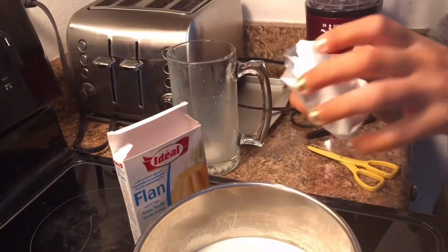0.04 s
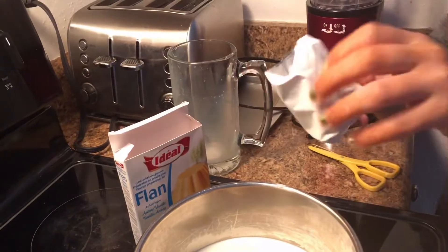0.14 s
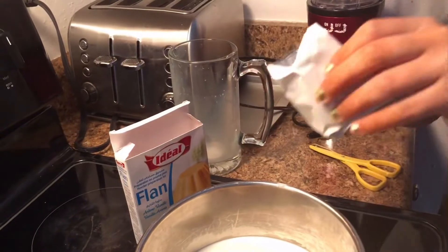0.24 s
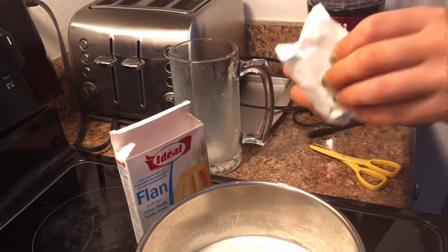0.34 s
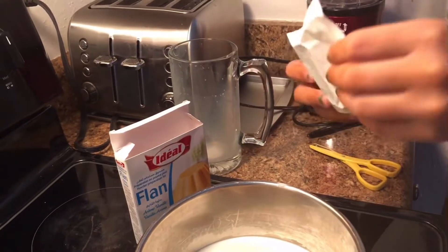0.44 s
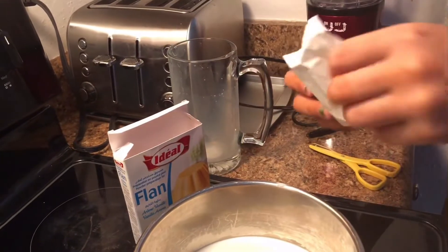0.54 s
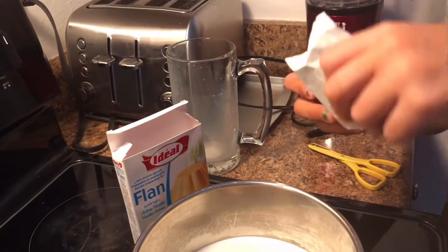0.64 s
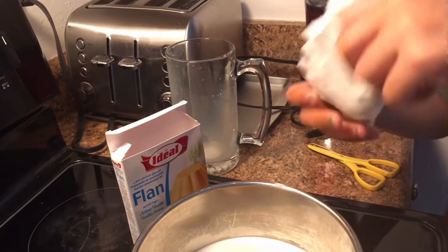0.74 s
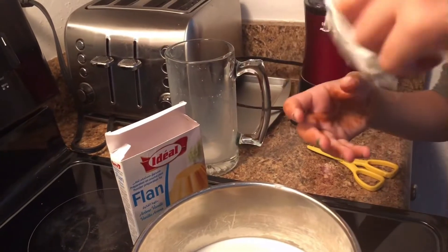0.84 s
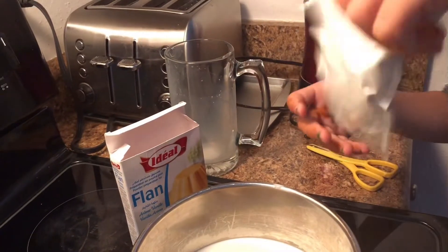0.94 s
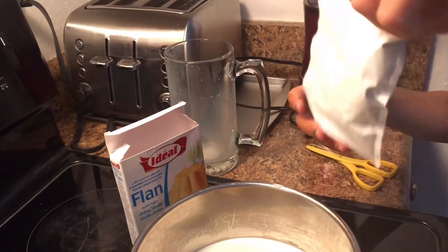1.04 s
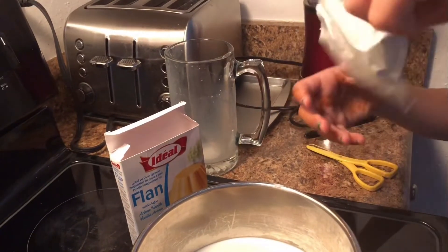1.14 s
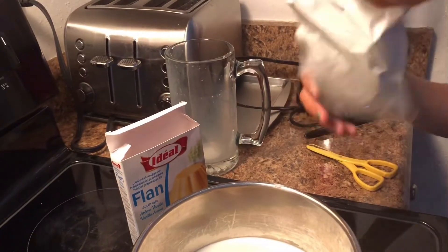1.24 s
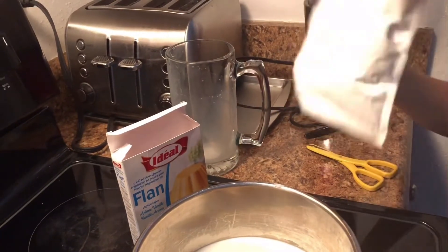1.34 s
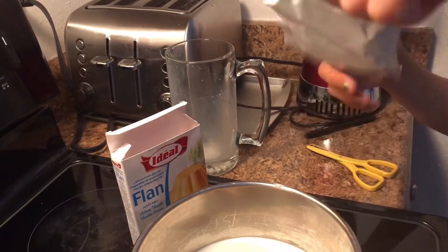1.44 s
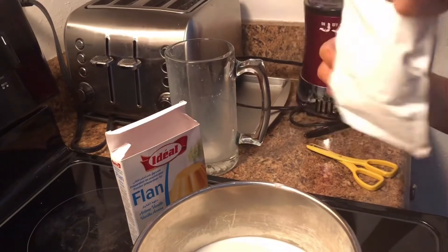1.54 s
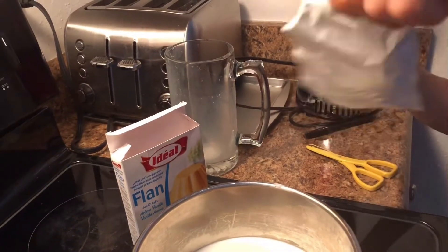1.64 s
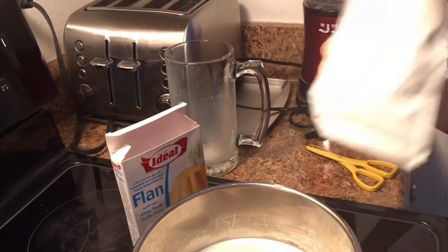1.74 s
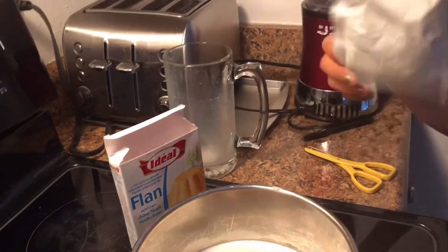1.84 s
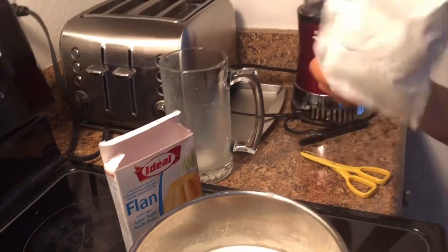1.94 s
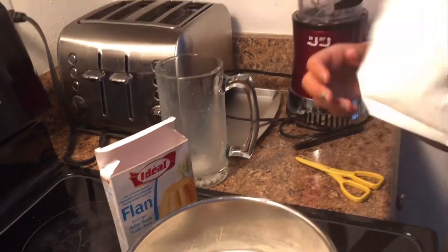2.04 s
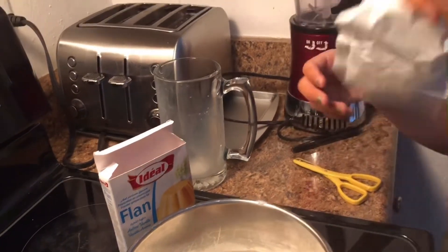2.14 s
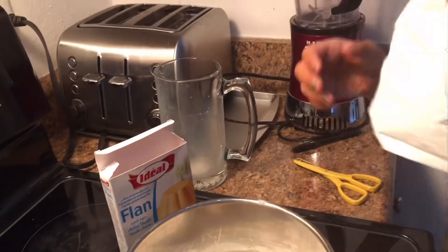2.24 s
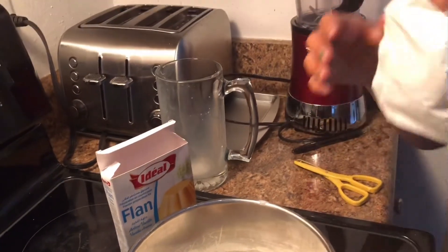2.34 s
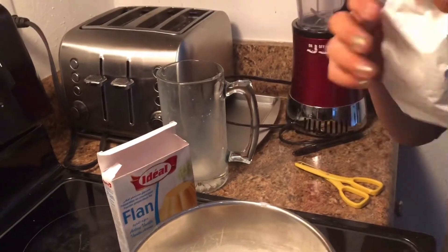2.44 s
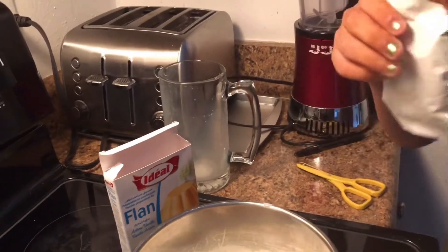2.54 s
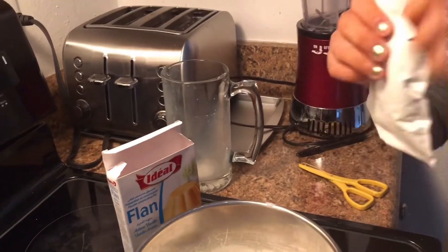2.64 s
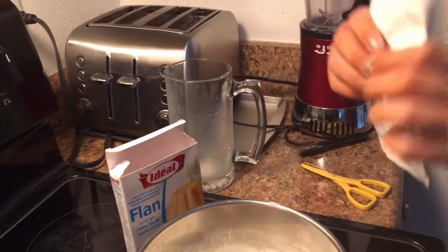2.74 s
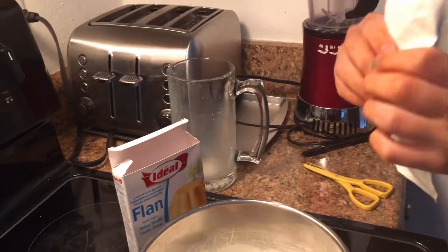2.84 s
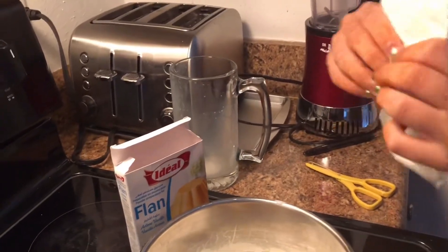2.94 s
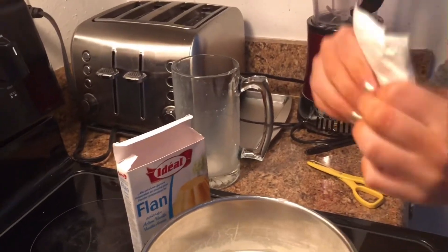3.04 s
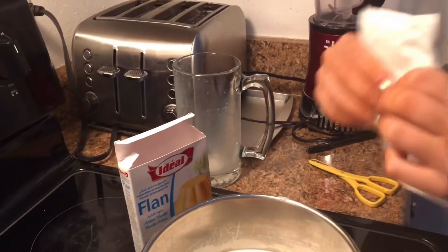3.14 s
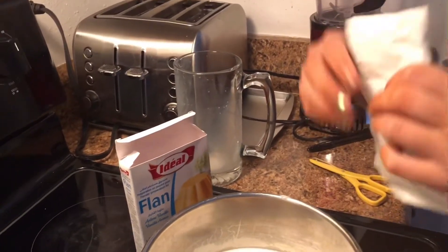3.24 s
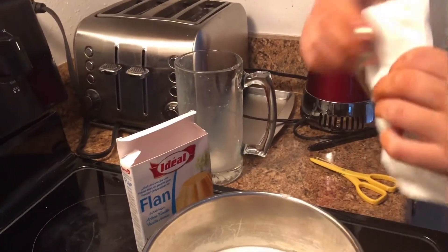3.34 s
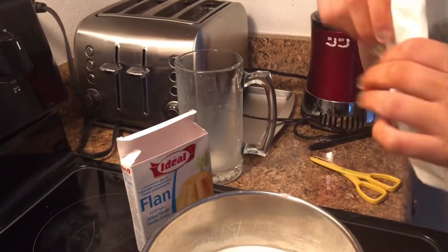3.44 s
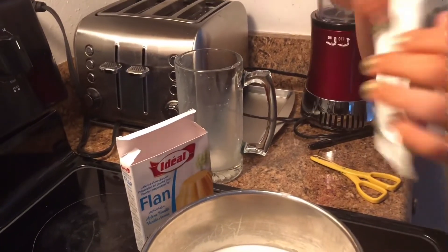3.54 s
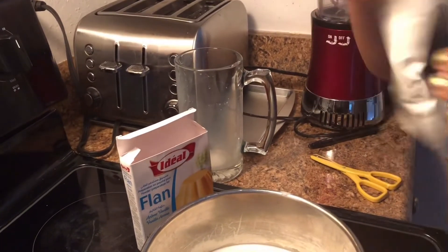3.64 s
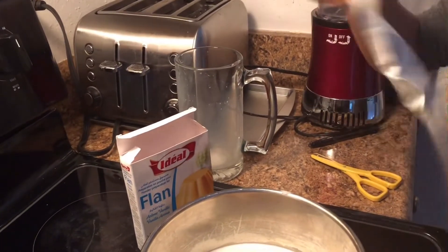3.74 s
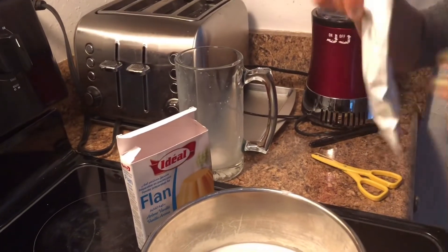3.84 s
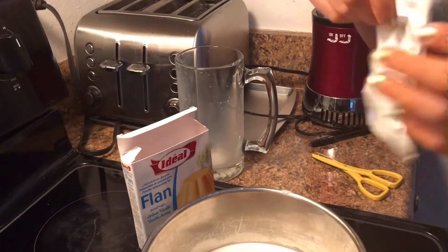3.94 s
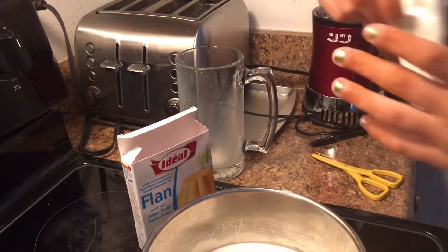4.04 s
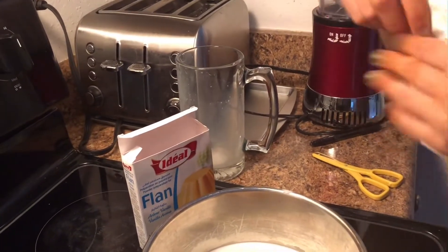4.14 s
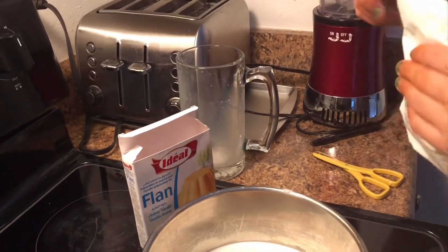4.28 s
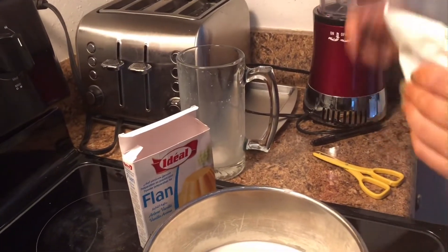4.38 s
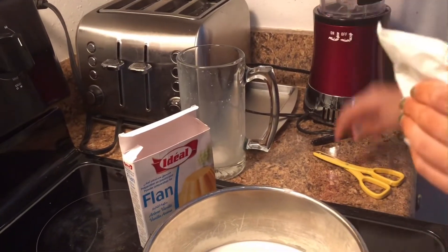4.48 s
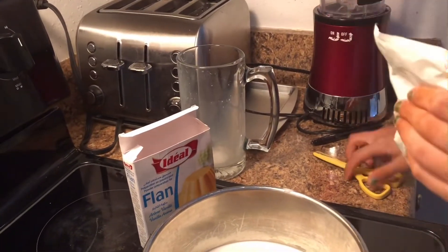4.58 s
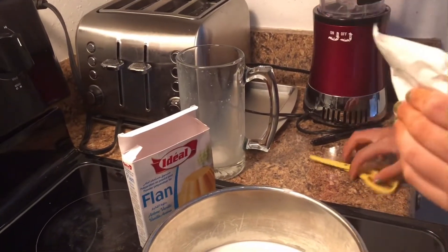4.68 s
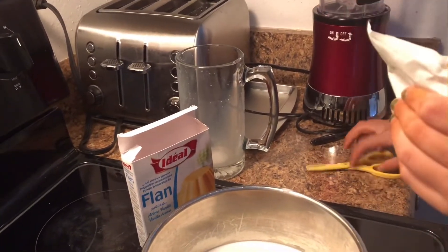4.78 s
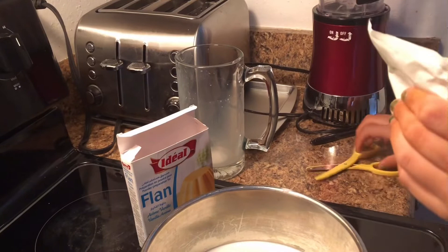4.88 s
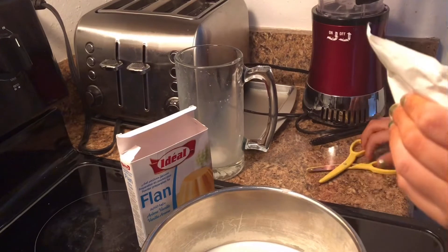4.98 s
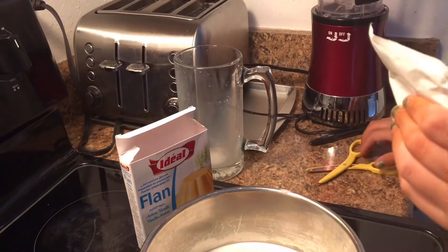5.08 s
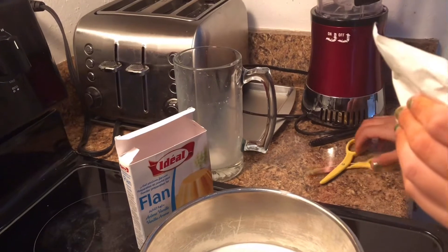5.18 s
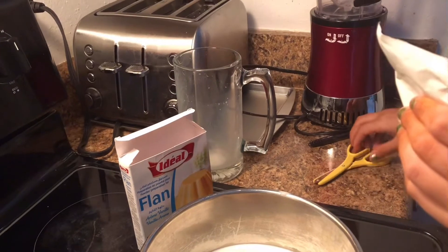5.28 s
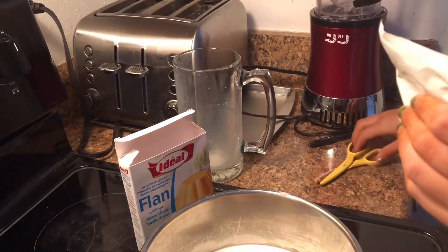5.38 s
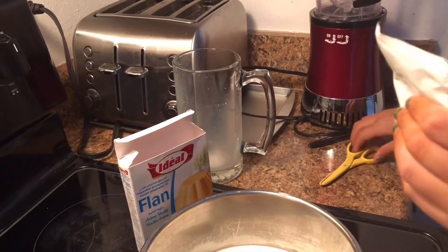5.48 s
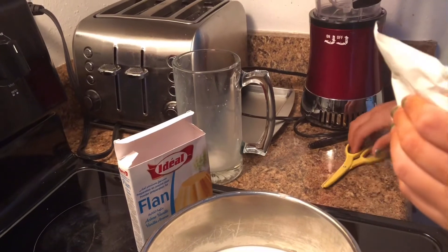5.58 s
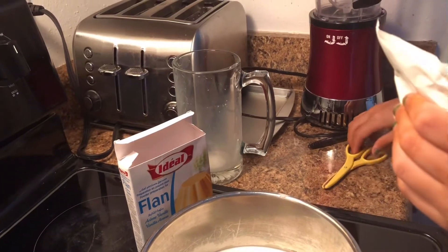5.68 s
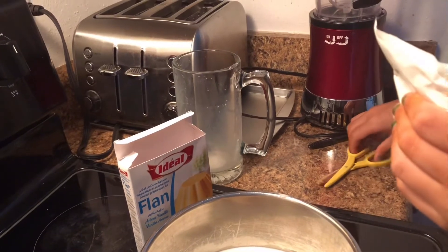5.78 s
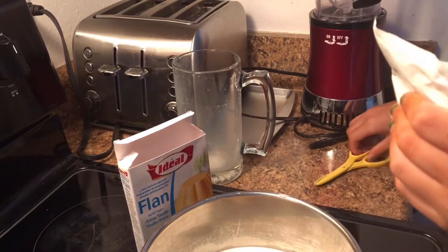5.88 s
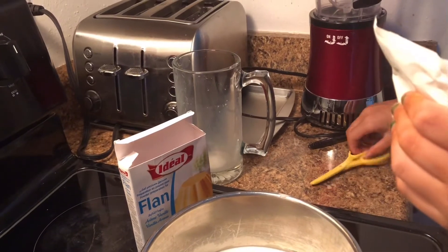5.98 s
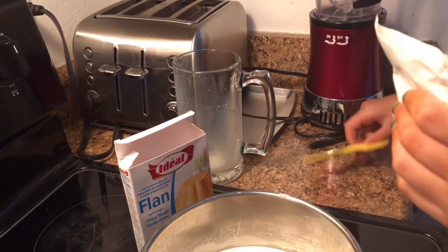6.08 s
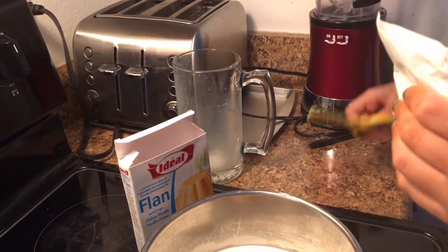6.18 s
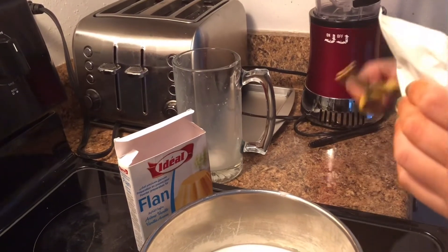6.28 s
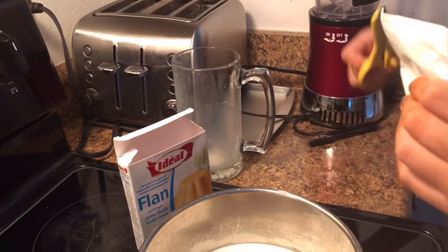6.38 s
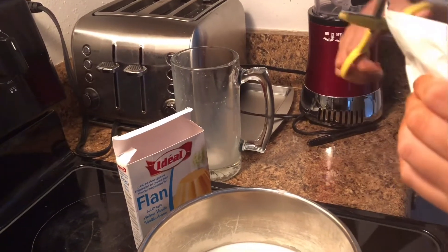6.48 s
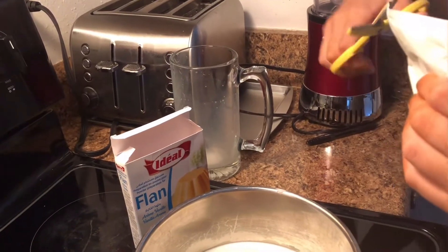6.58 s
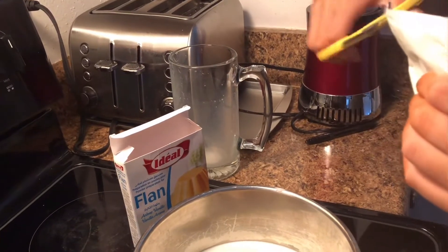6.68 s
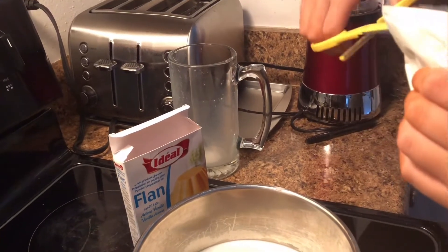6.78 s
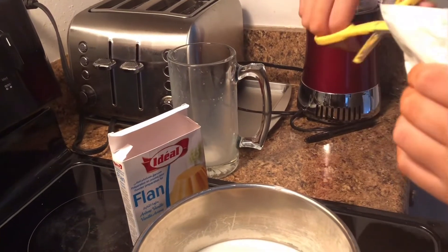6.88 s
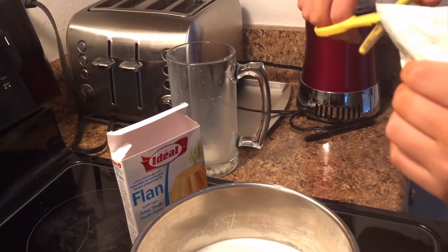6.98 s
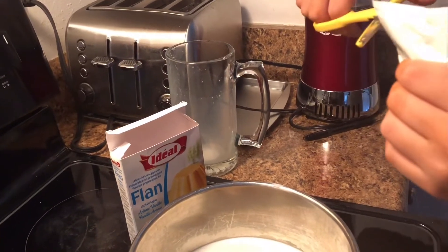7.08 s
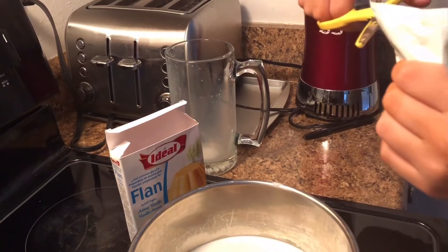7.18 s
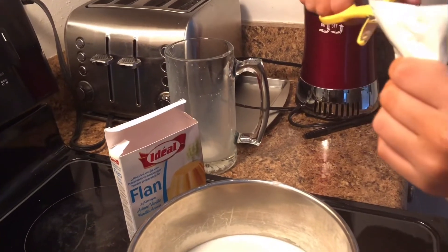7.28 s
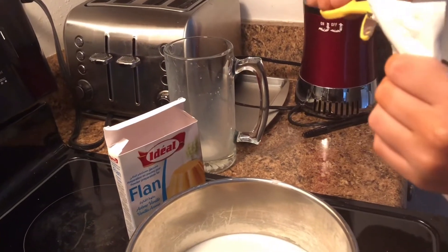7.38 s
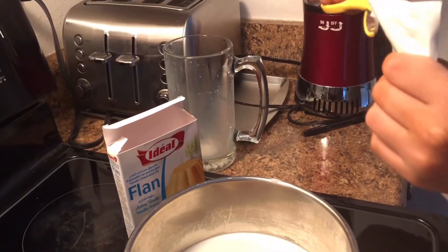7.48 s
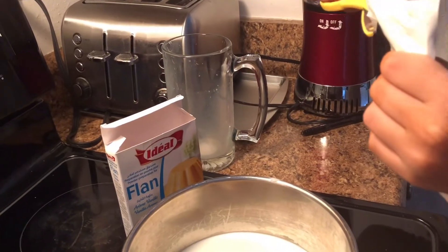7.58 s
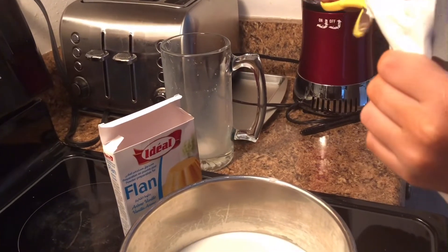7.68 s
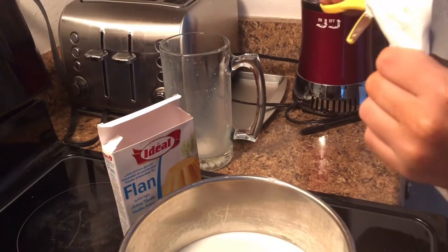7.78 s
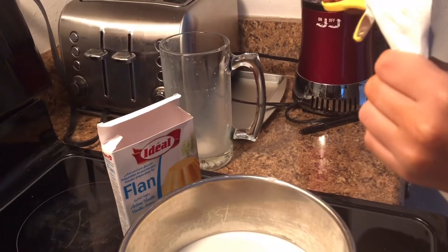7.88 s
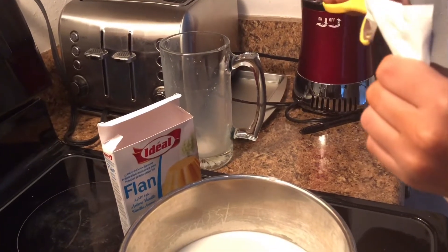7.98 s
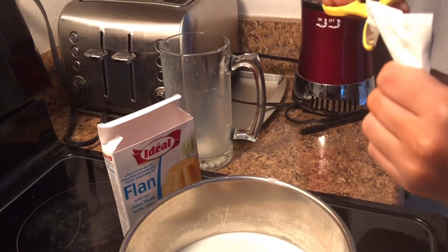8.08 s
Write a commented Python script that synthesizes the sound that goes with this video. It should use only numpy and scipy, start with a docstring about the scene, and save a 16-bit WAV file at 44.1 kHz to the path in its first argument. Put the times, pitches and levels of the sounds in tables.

```python
"""In a small kitchen with a humming appliance, a paper sachet of powder is shaken down and handled.
Its creases snap as ringing panels, its filled belly pops, and its sides rub as sprays of fine grains and folds.
Then scissors clink on the stone counter as bursts of noise with ringing steel modes, and drag over it.
They are picked up, click open and slowly close on the paper, blade sliding along blade."""
import sys
import numpy as np
from scipy import signal
from scipy.fft import rfft, irfft
from scipy.io import wavfile
from scipy.ndimage import map_coordinates

SR = 44100
rng = np.random.default_rng(int(sys.argv[2]) if len(sys.argv) > 2 else 0)


def unload_wav(signal):
    """Save mono or channel-first audio to the path in sys.argv[1] as 16-bit WAV at rate SR, clipped to [-1, 1]."""
    wavfile.write(
        sys.argv[1],
        SR,
        np.round(np.clip(np.atleast_2d(signal).T, -1, 1) * 32767).astype(np.int16),
    )


N = 358091

# Loud creases snapping through. Each row: start in seconds, panel level in dB over the first 8 ms,
# pitch of the paper panel in Hz, level of the sharp crack in dB relative to the panel.
SNAPS = [(0.278, -38.5, 1850, -17), (0.2858, -30.5, 4300, -10), (0.3316, -27.5, 1700, -13),
         (0.334, -32, 2260, -2.5), (0.394, -36, 1380, -28), (0.4448, -35.5, 1590, -11),
         (0.4495, -30.5, 5260, -20), (0.4685, -33, 1040, -17), (0.6927, -43.5, 2170, -17),
         (0.7079, -34, 2660, -5), (0.7192, -37.5, 2700, -5), (0.806, -33, 1260, -11),
         (0.917, -32.5, 1960, -20), (0.9236, -36.5, 2550, 1), (0.933, -28.5, 2200, -14),
         (0.9785, -37, 1470, -0.5), (1.026, -33, 2580, -5), (1.2172, -32.5, 2180, -5.5),
         (1.2428, -36.5, 1430, -6), (1.2543, -34, 2800, -4), (1.309, -31, 3220, -36),
         (1.3281, -22.5, 2580, -5), (1.4973, -32.5, 1920, -4), (1.5597, -22.5, 6400, -22),
         (1.5908, -31.5, 5650, -4), (1.6886, -37, 2720, -0.5), (1.7143, -39.5, 5340, -14),
         (1.797, -29.5, 3960, -28), (1.911, -42, 2480, -17), (1.935, -34.5, 1860, -8),
         (2.0551, -33, 1020, -28), (2.2376, -40, 3790, 1), (2.5454, -43.5, 1770, -8),
         (2.6592, -36, 2270, -17), (2.982, -46, 2100, -3), (3.0332, -42.5, 1750, -26),
         (3.1246, -43.5, 1950, 2.5), (3.149, -34, 1530, -19), (3.156, -35, 2780, 0),
         (3.236, -37.5, 1290, -12), (3.246, -44.5, 1390, 0.5), (3.2578, -39, 2570, -17),
         (3.557, -44.5, 2130, -4.5), (3.5941, -39.5, 2120, -13), (3.604, -35, 5200, -25),
         (3.6336, -35, 4430, -22), (3.643, -34, 3740, -18), (3.6705, -39.5, 1870, -28),
         (3.7363, -38.5, 2820, -2), (3.7546, -33.5, 2000, -8), (3.973, -40.5, 1560, -32),
         (4.0667, -51.5, 1260, -15), (4.204, -35.5, 1360, -7), (4.25, -41, 2090, -1.5),
         (4.2872, -34.5, 4460, -10), (4.4369, -50.5, 960, -26), (4.474, -49, 1700, -30),
         (7.056, -44.5, 920, -20), (7.4864, -41.5, 3620, -16), (7.5418, -40.5, 6520, -20),
         (7.5523, -33.5, 2840, 1)]
# How hard the fingers work the sachet. Each row: time in seconds, level of steady crumpling in dB before trim.
GRIP = [(0, -63), (0.2, -61.5), (0.38, -50.5), (0.62, -59), (0.78, -60), (1.19, -71), (1.3, -57),
        (2.0, -64), (2.45, -64), (2.75, -60.5), (2.9, -54), (3.24, -54.5), (3.37, -59.5), (3.68, -59),
        (4.07, -72), (4.55, -70.5), (4.66, -79.5), (7.05, -78), (7.5, -62.5), (8.12, -73)]
# Modes of the scissors. Each row: pitch in Hz, relative level in dB, free ring time (t60) in seconds.
BLADES = [(824, -11, 0.14), (1133, -6, 0.24), (1600, -3.5, 0.11), (1970, -4, 0.14), (2400, -7, 0.13),
          (2640, -7, .09), (3000, -9, .16), (3300, 2.5, 0.042), (3600, -5.5, 0.073), (3980, -3, 0.096),
          (4400, -14, 0.12), (4950, -7.5, 0.096), (6020, -0.5, 0.098), (6700, -7.5, 0.205),
          (6970, -1.5, 0.11), (7535, 5.5, 0.13), (7470, 2.5, 0.064), (7560, -5.5, .1), (8510, -2, 0.15),
          (9000, -2, .06), (10150, -18.5, 0.0786), (10270, -5.5, 0.16), (11100, -8, 0.056),
          (11700, 1, 0.18), (11700, -6.5, 0.15), (12900, -4.5, 0.075), (13800, -7.5, .1), (13710, -4, .09),
          (14600, -12, 0.069), (15400, -1, 0.06)]
LIFT_S = 6.2  # the scissors leave the counter


def from_db(db):
    """Decibels to gain."""
    return 10 ** (np.asarray(db) / 20)


def rms_one(x):
    """Scale to unit rms."""
    return x / np.sqrt(np.mean(x ** 2) + 1e-20)


def add(out, s, sound):
    """Mix a sound in at time s."""
    i = int(np.clip(round(s * SR), 0, N - 1))
    out[i:i + len(sound)] += sound[:N - i]


def drift(rate):
    """Random wander with unit spread, in straight lines between `rate` random points per second."""
    knots = rng.standard_normal(4096)
    wander = np.interp(np.arange(N) / SR * rate, np.arange(len(knots)), knots)
    return wander * np.sqrt(3 / 2)  # makes up for the spread lost between points


def colour(x, spectrum):
    """Causal (minimum-phase) filter through the given points (Hz, dB), with falling skirts outside them."""
    size = 8192
    hz, db = np.transpose(spectrum)
    grid = np.maximum(np.arange(size // 2 + 1) * SR / size, 1)
    octaves_outside = np.maximum(np.log2(hz[0] / grid), 0) + np.maximum(np.log2(grid / hz[-1]), 0)
    skirts_db = np.maximum(-24 * octaves_outside, -50)
    gain = from_db(np.interp(np.log(grid), np.log(hz), db) + skirts_db)
    # folding the cepstrum onto positive time makes the filter minimum-phase
    cepstrum = irfft(np.log(gain))
    cepstrum[1:size // 2] *= 2
    cepstrum[size // 2 + 1:] = 0
    impulse = irfft(np.exp(rfft(cepstrum)))
    return signal.fftconvolve(x, impulse)[:len(x)]


def resonate(x, hz, width_hz):
    """Two-pole resonance with gain 1 at its top."""
    r = np.exp(-np.pi * width_hz / SR)
    feed = np.array([1, 0, -1]) * (1 - r * r) / 2
    return signal.lfilter(feed, [1, -2 * r * np.cos(2 * np.pi * hz / SR), r * r], x)


def narrow_noise(count, hz, width_hz):
    """Noise through two equal resonances, each twice width_hz wide."""
    once = resonate(rng.standard_normal(count), hz, 2 * width_hz)
    return resonate(once, hz, 2 * width_hz)


def high_pass(x, hz):
    """Second-order high-pass."""
    return signal.sosfilt(signal.butter(2, min(hz, SR / 3), "high", fs=SR, output="sos"), x)


def fade(t, t60):
    """Decay that loses 60 dB in t60."""
    return np.exp(-np.log(1000) * t / t60)


def hit_level(x, db):
    """Give a hit this rms level over its first 8 ms."""
    return from_db(db) * x / np.sqrt(np.mean(x[:int(.008 * SR)] ** 2) + 1e-20)


def grains(per_s, spread_db):
    """Random tiny clicks of uneven size and sign; rms 1."""
    sizes = from_db(spread_db * np.minimum(rng.exponential(1, N), 4))
    signs = rng.choice([-1, 1], N)
    return rms_one(sizes * signs * (rng.random(N) < per_s / SR))


def swells(rows):
    """Gain of a run of swells (s at the top, dB, rise s, fall s); their powers add."""
    # 24 dB below the top at one rise or fall time away; a power above 1 rounds the top
    depth_db, roundness = 24, 1.36
    t, power = np.arange(0, N + 32, 32) / SR, 0
    for s, db, rise_s, fall_s in rows:
        away = np.maximum((s - t) / rise_s, (t - s) / fall_s)
        power = power + from_db(db - depth_db * np.abs(away) ** roundness) ** 2
    return np.interp(np.arange(N) / SR, t, np.sqrt(power))


def background(waver_db=0.5, wander_turns=0.038):
    """Steady coloured room noise, and an appliance: slightly wavering hum partials and a noisy housing drone."""
    # Room noise. Each row: frequency in Hz, relative density in dB.
    air_colour = [(25, -22.5), (45, -8.5), (80, -0.5), (105, -6.5), (155, -11), (205, 3.5), (280, -3.5),
                  (330, -10.5), (400, -5.5), (600, -14), (1100, -18.5), (2200, -31.5), (6000, -38),
                  (16000, -53)]
    # Appliance hum. Each row: pitch in Hz, level in dB rms.
    partials = [(59.5, -63.5), (119.8, -62), (239, -68.5), (360, -71.5)]
    # Housing drone: pitch in Hz, width setting in Hz, level in dB rms.
    drone_hz, drone_width_hz, drone_db = (199.7, 18, -57.5)
    air_db = -54.5
    t, run_in = np.arange(N) / SR, 8192  # the filters settle during the run-in samples
    hum = np.zeros(N)
    for hz, db in partials:
        level = np.sqrt(2) * from_db(db + waver_db * drift(9.5))
        hum += level * np.sin(2 * np.pi * (hz * t + wander_turns * drift(11)))
    drone = narrow_noise(N + run_in, drone_hz, drone_width_hz)[run_in:]
    air = colour(rng.standard_normal(N + run_in), air_colour)[run_in:]
    return hum + from_db(drone_db) * rms_one(drone) + from_db(air_db) * rms_one(air)


def kitchen(x, near_db, room_db, near_t60=0.042, room_t60=0.22):
    """Quick reflections from the counter and the things on it, then the room's short tail."""
    # What the counter and walls give back. Each row: frequency in Hz, relative gain in dB.
    walls = [(100, 3), (500, 4.5), (2500, 4), (7000, 2), (16000, -1.5)]
    t = np.arange(SR // 2) / SR
    sparse = rng.standard_normal(len(t)) * (rng.random(len(t)) < .05)
    near = sparse * fade(t, near_t60) * (t > .002)
    far = rng.standard_normal(len(t)) * fade(t, room_t60) * (t > .008)
    echo = from_db(near_db) * rms_one(colour(near, walls)) + from_db(room_db) * rms_one(colour(far, walls))
    return signal.fftconvolve(x, echo / np.sqrt(len(t)))[:N]


def bounce(x, delay_s=0.000859, sway=0.21, bounce_db=-14):
    """A reflection off the counter combs the sound, and the comb drifts as the distance to the counter changes."""
    late = np.arange(N) - SR * delay_s * np.exp(sway * drift(4.5))
    reflection = from_db(bounce_db) * map_coordinates(x, [late], order=3)
    return (x + reflection) / np.sqrt(1 + from_db(bounce_db) ** 2)


def drag(width_hz=190, grit_db=-4, judder_db=1.0, shift_db=4.5):
    """Sliding steel catches on tiny bumps that stir its damped modes, now one, now another as contact shifts."""
    # Scissors dragged over the stone. Each row: time of the top in seconds, level in dB, rise and fall in seconds.
    scrapes = [(4.78, -53, 0.44, 0.19), (4.66, -52, 0.01, 0.032), (4.91, -53, .05, 0.094),
               (5.035, -45.5, 0.065, 0.042), (5.23, -46.5, 0.034, 0.05), (5.3, -42.5, 0.046, 0.044),
               (5.465, -47.5, 0.064, .07), (5.93, -45.5, 0.059, 0.044), (6.03, -52.5, 0.073, 0.075)]
    # Blade along blade, once on the counter, then in the slow cut. Each row: the same columns.
    closings = [(5.298, -47, 0.045, 0.028), (7.49, -53.5, 0.35, 0.12)]
    # Colours of steel on stone and of blade on blade. Each row: frequency in Hz, relative gain in dB.
    scrape_colour, shear_colour = [(350, -7), (850, 10.5), (1500, 1), (2500, 0), (5000, -7), (7500, -8.5),
                                   (9500, -13), (14000, -22.5), (16000, -18.5)], [(3000, -10.5), (5500, -6.5), (7500, -4), (9300, -2),
                                                   (11300, -0.5), (13500, 5), (15500, -5.5)]
    on_stone = swells(scrapes)
    # the dragged blades also shear against each other, 11 dB below the scrape
    shearing = np.hypot(swells(closings), from_db(-11) * on_stone)
    bumps = grains(per_s=1500, spread_db=3.5) * from_db(judder_db * drift(90))
    body = np.zeros(N)
    for k, (hz, db, _) in enumerate(BLADES):
        # the signs alternate from mode to mode
        body += (-1) ** k * from_db(db + shift_db * drift(25)) * resonate(bumps, hz, width_hz)
    rub = rms_one(body) + from_db(grit_db) * bumps
    return rms_one(colour(rub, scrape_colour)) * on_stone + rms_one(colour(rub, shear_colour)) * shearing


def scissors(rise_s=0.00034, knock_t60=0.046, clang_t60=0.04, tick_t60=0.044, knock_db=-1, clang_db=-2,
             tick_db=-1, modes_db=-9, uneven_db=10.0, hollow_db=11, hollow_width_hz=260):
    """Each contact is a brief chatter of steel on stone or steel; it strikes every mode with its own strength."""
    # Contacts with the counter or each other. Each row: start in seconds, knock of the handles in dB,
    # pitch of the knock in Hz, ring of the blades in dB, tick of the edges in dB (levels before trim).
    clinks = [(4.6328, -50, 900, -56.5, -46.5), (4.686, -38, 3900, -44, -46),
              (4.7035, -40, 2660, -29.5, -38), (4.8067, -48.5, 895, -47, -40),
              (4.8709, -45.5, 1800, -45.5, -42.5), (5.0212, -53.5, 1500, -58, -42),
              (5.03, -51, 1000, -48, -44), (5.4413, -37, 3800, -38.5, -39), (5.4911, -35, 2880, -29, -36.5),
              (5.6572, -46, 1700, -51, -41), (5.67, -31, 2460, -30, -26.5), (5.688, -36, 2850, -42, -38),
              (5.8453, -52, 1960, -58, -45), (5.893, -60, 3300, -54.5, -44), (5.919, -47.5, 2500, -46, -42),
              (5.9578, -34.5, 2470, -30.5, -34.5), (5.9619, -37.5, 2550, -26.5, -42.5),
              (6.2618, -54, 4440, -46.5, -36.5), (6.428, -52, 3400, -59, -60),
              (6.4749, -38, 1124, -34, -22.5), (7.203, -68, 5000, -65, -72), (7.512, -51, 2200, -47.5, -58),
              (7.9416, -72, 5000, -55, -58)]
    # Colours of the contacts. Each row: frequency in Hz, relative gain in dB.
    knock_colour, clang_colour, tick_colour = [(300, 10.5), (480, -4), (650, 0.5), (900, 2), (1150, 0.5),
                                               (1450, -1), (2400, 2.5), (3500, -3.5), (5000, 2),
                                               (6500, -22.5)], [(4000, -68), (5600, -5), (6700, 6), (7500, 4),
                                                              (8500, 6.5), (9400, -28), (11000, -47)], [(7500, -15), (9800, -7.5),
                                                                             (11200, -4.5), (12500, -10),
                                                                             (13700, -2), (15500, -5)]
    # Centres of the knock, ring and tick registers in Hz.
    registers = [3900, 5500, 18000]
    ring_lying, ring_held = 0.55, 0.67  # share of the free ring time left on the counter and in the hand
    out, t = np.zeros(N), np.arange(16384) / SR
    onset = 1 - np.exp(-t / rise_s)
    hz, mode_db, free_t60 = np.transpose(BLADES)[:, :, None]

    def chatter(t60):
        """Decaying burst of noise."""
        return rng.standard_normal(len(t)) * onset * fade(t, t60)

    for s, handle_db, knock_hz, blade_db, edge_db in clinks:
        ring_share = ring_lying if s < LIFT_S else ring_held
        knock = chatter(knock_t60)
        # the place that is struck gives the knock its pitch
        knock = knock + from_db(hollow_db) * resonate(knock, knock_hz, hollow_width_hz)
        add(out, s, hit_level(colour(knock, knock_colour), handle_db + knock_db))
        add(out, s, hit_level(colour(chatter(clang_t60), clang_colour), blade_db + clang_db))
        add(out, s, hit_level(colour(chatter(tick_t60), tick_colour), edge_db + tick_db))
        strike_db = np.interp(hz, registers, [handle_db, blade_db, edge_db])
        strike_db = strike_db + uneven_db * rng.uniform(-0.6, 1, hz.shape)
        modes = np.sin(2 * np.pi * (hz * t + rng.random(hz.shape))) * fade(t, free_t60 * ring_share)
        add(out, s, onset * np.sum(from_db(strike_db + mode_db + modes_db) * modes, axis=0))
    return out


def glides():
    """Skin slipping on paper gives a soft, narrow whisper."""
    # Fingertip glides. Each row: start and end in seconds, centre in Hz, width setting in Hz, level in dB
    # ahead of the fade in and out.
    slips = [(-0.03, 0.28, 2260, 453, -55), (0.0, 0.204, 4630, 600, -67), (2.38, 2.565, 3960, 800, -58.5),
             (4.095, 4.203, 4930, 695, -67.5)]
    out = np.zeros(N)
    for start, end, hz, width_hz, db in slips:
        whisper = rms_one(narrow_noise(N, hz, width_hz))
        phase = np.clip((np.arange(N) / SR - start) / (end - start), 0, 1)
        out += from_db(db) * whisper * np.sqrt(np.abs(np.sin(np.pi * phase)))
    return out


def rustle(slide_db=.5, crumple_db=-1, flutter_db=2.5, clump_db=2.0, fold_damping=0.34, count=12):
    """Sliding is a dense spray of fine grains; crumpling is sparser: many small folds, each with its own pitch."""
    # Paper and powder slide at each shake or shift of the hands. Each row: time of the top in seconds,
    # level in dB before trim, rise and fall in seconds.
    strokes_played = [(0.0, -53.5, .05, 0.058), (0.16, -56, .015, 0.31), (0.465, -44, 0.12, 0.062),
                      (0.85, -46, 0.05, .14), (1.0, -37.5, .15, 0.17), (1.438, -39, 0.11, 0.095),
                      (1.512, -29.5, 0.057, 0.037), (1.612, -38, 0.1, 0.063), (1.73, -41, 0.17, 0.11),
                      (1.84, -45, .13, .16), (1.965, -41, 0.1, .1), (2.118, -35.5, 0.079, .06),
                      (2.19, -31.5, 0.067, 0.042), (2.303, -40.5, 0.2, 0.075), (2.37, -43.5, .04, 0.05),
                      (2.575, -48.5, 0.1, 0.1), (2.655, -44.5, 0.065, 0.035), (2.977, -52, 0.018, .07),
                      (3.15, -37, 0.031, 0.03), (3.305, -39, 0.033, 0.031), (3.78, -39.5, 0.14, 0.19),
                      (3.865, -40.5, 0.046, .12), (4.295, -51, 0.094, .04), (7.08, -59.5, 0.03, 0.066),
                      (7.567, -49, .05, 0.079), (7.81, -53, 0.11, 0.092), (7.965, -49.5, 0.019, 0.21)]
    # The paper is squeezed and bunches up. Each row: time of the top in seconds, level in dB before trim.
    squeezes_played = [(0.465, -44), (0.93, -42), (1.035, -46.5), (1.96, -48), (2.54, -48.5), (2.895, -51),
                       (2.977, -43.5), (3.15, -39.5), (3.62, -44), (3.755, -39.5), (4.257, -44.5),
                       (7.09, -59.5), (7.77, -64.5), (7.97, -58)]
    # Small folds giving way around each loud snap: level in dB relative to it, rise and fall in seconds.
    folds_db, rise_s, fall_s = (-15.5, 0.0182, 0.034)
    # Colours of sliding and crumpling. Each row: frequency in Hz, relative gain in dB.
    slide_colour, crumple_colour = [(500, -14.5), (1200, -12), (2500, -1), (4000, -1), (6500, 2),
                                    (9000, -1.5), (12000, -4), (15500, -3.5)], [(200, -7.5), (450, 5.5), (620, -2), (850, -3),
                                                   (1200, -2.5), (1600, -3.5), (2200, -2.5), (3200, -11),
                                                   (5000, -1), (9000, -39)]
    # Lowest and highest pitch of the small folds in Hz.
    fold_range_hz = (580, 3270)
    squeeze_rise_s, squeeze_fall_s = .05, 0.079
    # the grip also makes the paper slide a little, and sliding also crumples it
    grip_slide_db, slide_crumple_db = -2.5, -18

    grip_s, grip_db = np.transpose(GRIP)
    grip = from_db(np.interp(np.arange(N) / SR, grip_s, grip_db))
    strokes = swells(strokes_played)
    squeezes = swells([(s, db, squeeze_rise_s, squeeze_fall_s) for s, db in squeezes_played])
    at_snaps = swells([(s, db + folds_db, rise_s, fall_s) for s, db, _, _ in SNAPS])
    sliding = np.hypot(strokes, from_db(grip_slide_db) * grip)
    stroke_crumple = from_db(slide_crumple_db) * strokes
    crumpling = np.sqrt(grip ** 2 + squeezes ** 2 + at_snaps ** 2 + stroke_crumple ** 2)

    slide = rms_one(colour(grains(per_s=20000, spread_db=1), slide_colour))
    folds = np.zeros(N)
    for hz in np.geomspace(*fold_range_hz, count):
        fold = resonate(grains(per_s=210, spread_db=3), hz, fold_damping * hz)
        folds += rms_one(fold) * np.sqrt(hz)
    crumple = rms_one(colour(folds, crumple_colour))
    slide_gain = sliding * from_db(slide_db + flutter_db * drift(120))
    crumple_gain = crumpling * from_db(crumple_db + clump_db * drift(140))
    return slide * slide_gain + crumple * crumple_gain


def thumps(t60=0.013, rise_s=0.00033, sag=0.417, sag_s=0.0027, rough=0.35):
    """The filled belly buckles with a dull pop whose pitch sags as the paper slackens."""
    # Belly pops. Each row: start in seconds, nominal pitch in Hz that the sag bends,
    # level in dB over the first 8 ms.
    pops = [(0.4715, 800, -34.5), (0.966, 480, -36), (0.98, 850, -37), (1.02, 227, -44.5),
            (1.245, 850, -35), (1.354, 500, -43), (1.5, 800, -44.5), (1.562, 680, -39.5), (1.935, 850, -37),
            (2.155, 417, -42.5), (2.241, 400, -41), (3.092, 730, -38), (3.757, 520, -39), (3.949, 610, -38)]
    out, t = np.zeros(N), np.arange(4096) / SR
    for s, hz, db in pops:
        pitch = hz * (1 + sag * (np.exp(-t / sag_s) - .5))
        tone = np.sin(2 * np.pi * np.cumsum(pitch) / SR)
        pop = tone + rough * rms_one(resonate(rng.standard_normal(len(t)), hz, hz))
        add(out, s, hit_level(pop * (1 - np.exp(-t / rise_s)) * fade(t, t60), db))
    return out


def faint_snaps(crack_rel_db=-11):
    """Small creases give way at random moments, stronger when the grip is firm; rows as in SNAPS."""
    per_s, over_grip_db, spread_db = 9, 10, 2
    low_hz, high_hz = 1080, 2770
    when, size, pitch, chance = rng.random((200, 4)).T
    s = when * N / SR
    db = np.interp(s, *np.transpose(GRIP)) + over_grip_db + spread_db * (2 * size - 1)
    hz = low_hz * (high_hz / low_hz) ** pitch
    rows = np.column_stack([s, db, hz, np.full(len(s), crack_rel_db)])
    # keep only as many candidates as the rate asks for, on average
    return rows[chance < per_s * N / SR / len(s)]


def snaps(overtone=2.65, overtone_db=-11, burst_db=-2, burst_t60=0.0042, shiver_db=-17, shiver_t60=0.04,
          crack_hz=6000, flap_db=-11):
    """A crease flips in one brief jolt; its panel rings for a few cycles while the sheet shivers on."""
    # Low flap of the panel pushing air. Each row: frequency in Hz, relative gain in dB.
    flap_colour = [(220, -13.5), (330, -8.5), (480, -2.5), (630, -6.5), (850, 4.5), (1300, -26.5)]
    flap_loss_db = 6.5  # smaller panels push less air: loss per octave of pitch
    # width of a 2 kHz panel's ring as a share of its pitch; higher panels are damped more, by this power
    panel_width, panel_width_power = 0.42, 0.45
    out, t = np.zeros(N), np.arange(4096) / SR
    envelope = from_db(burst_db) * fade(t, burst_t60) + from_db(shiver_db) * fade(t, shiver_t60)
    for s, db, hz, crack_rel_db in [*SNAPS, *faint_snaps()]:
        noise = rng.standard_normal(len(t))
        jolt = noise * envelope
        jolt[0] += np.sign(noise[-1])  # the flip itself, to either side
        smallness = hz / 2000
        width_hz = hz * panel_width * smallness ** panel_width_power
        upper = resonate(jolt, min(overtone * hz, SR / 3), overtone * width_hz)
        panel = resonate(jolt, hz, width_hz) - from_db(overtone_db) * upper
        crack = high_pass(resonate(jolt, 7140, 3900), crack_hz)
        add(out, s, hit_level(high_pass(panel, 0.084 * hz), db))
        add(out, s, hit_level(crack, db + crack_rel_db))
        loss_db = flap_loss_db * np.log2(smallness)
        add(out, s, hit_level(colour(jolt, flap_colour), db + flap_db - loss_db))
    return out


def scene(lifted_db=-4):
    """Sachet and scissors close by, the hum all around; once lifted, the scissors sound nearer and drier."""
    paper = bounce(snaps() + thumps() + rustle() + glides())
    steel = bounce(scissors() + drag())
    # the lifted scissors send less into the echoes
    steel_sent = steel * from_db(lifted_db * (np.arange(N) / SR > LIFT_S))
    paper_echo = kitchen(paper, near_db=-10.5, room_db=-18.5)
    steel_echo = kitchen(steel_sent, near_db=-12.0, room_db=-13.5)
    return (paper + steel + paper_echo + steel_echo + background())[None]


def record(dry):
    """A steep low-pass cuts the top of the treble."""
    cutoff_hz = 15900
    return signal.sosfilt(signal.ellip(12, .1, 80, cutoff_hz, fs=SR, output="sos"), dry)


dry = scene()
out = record(dry)
unload_wav(out)
```